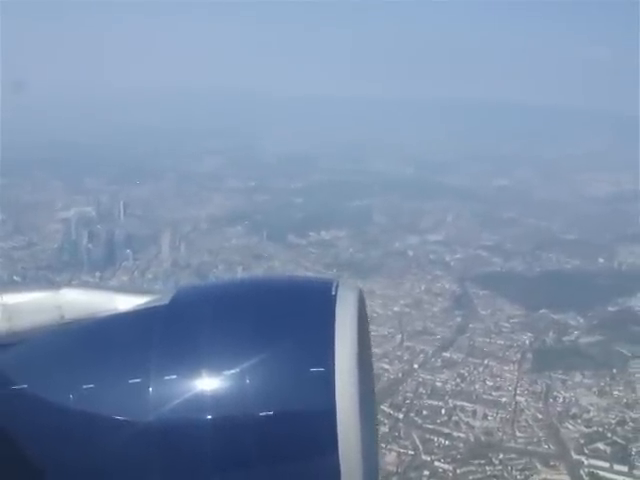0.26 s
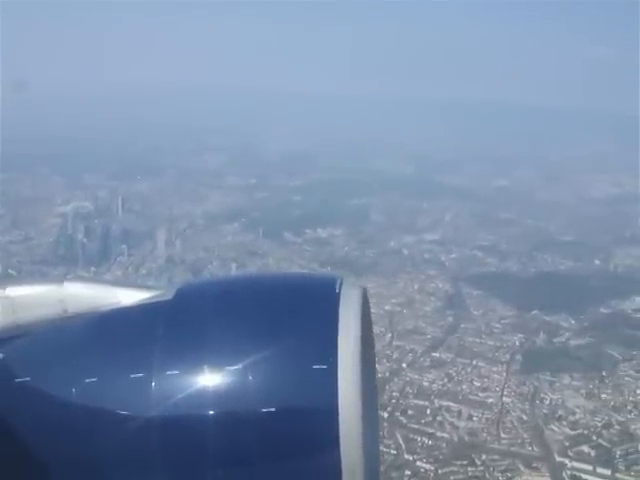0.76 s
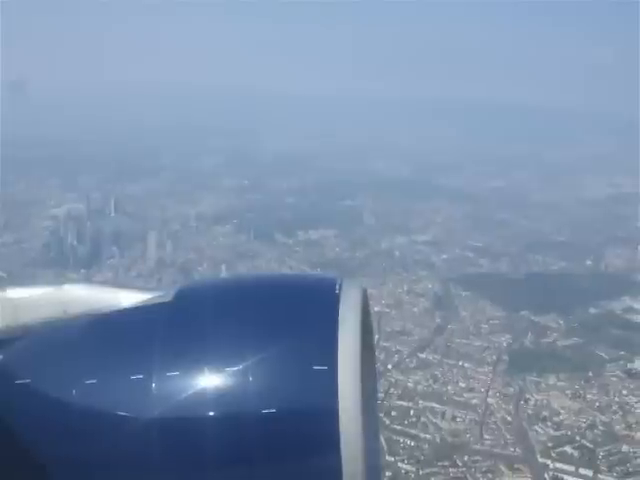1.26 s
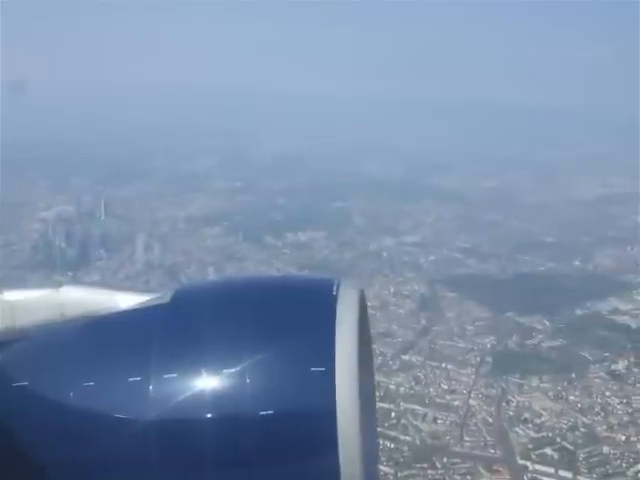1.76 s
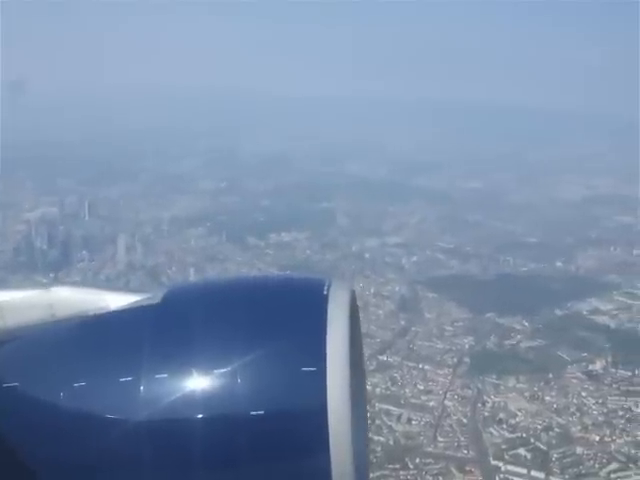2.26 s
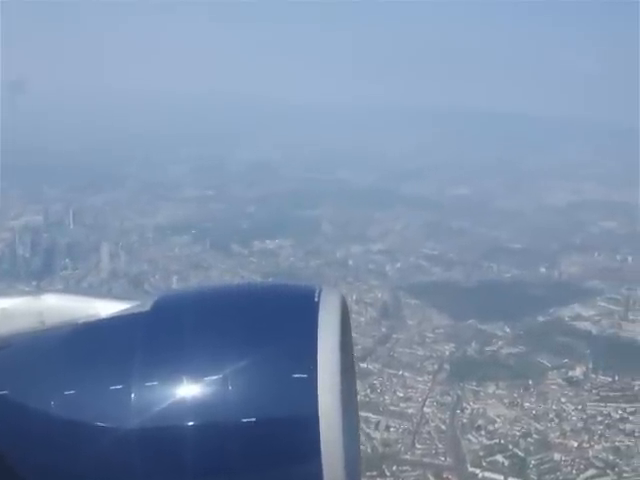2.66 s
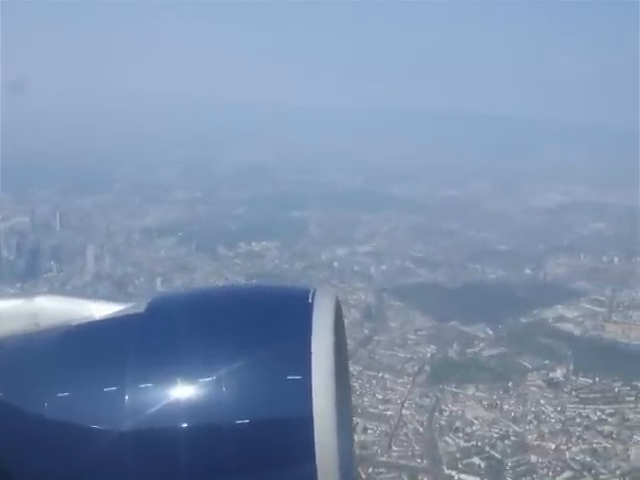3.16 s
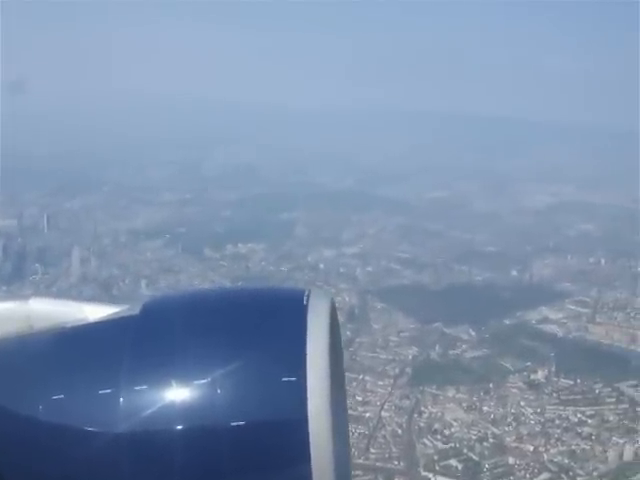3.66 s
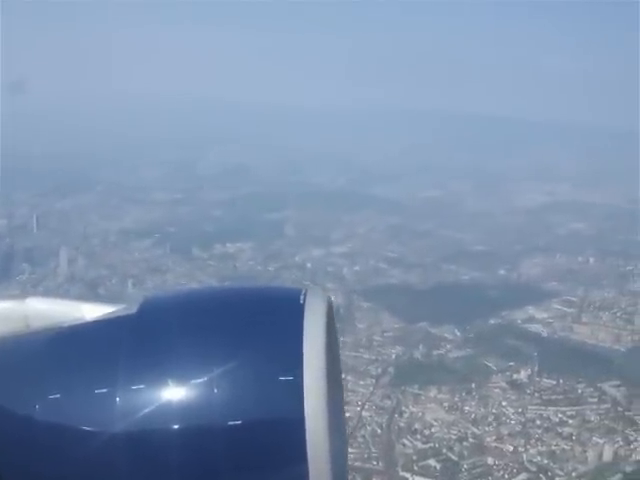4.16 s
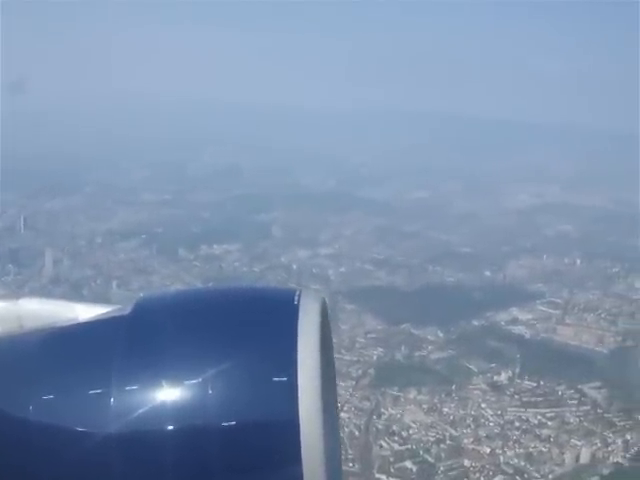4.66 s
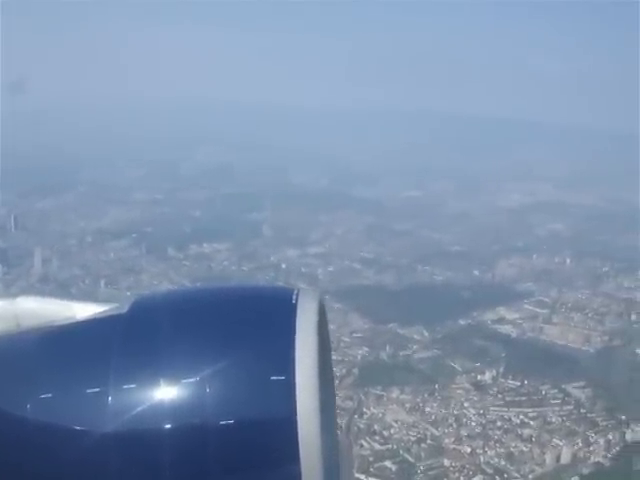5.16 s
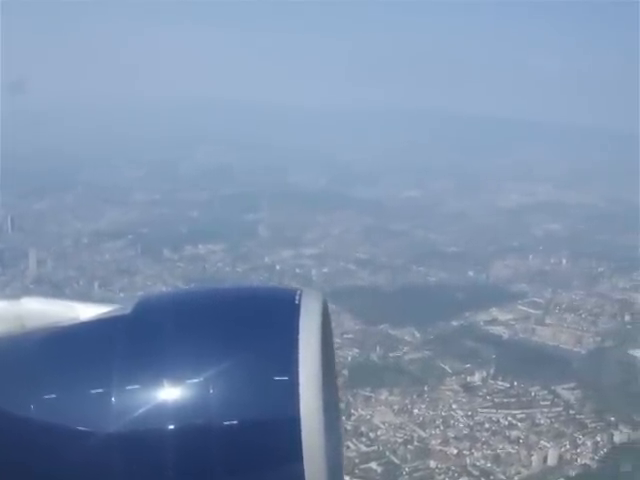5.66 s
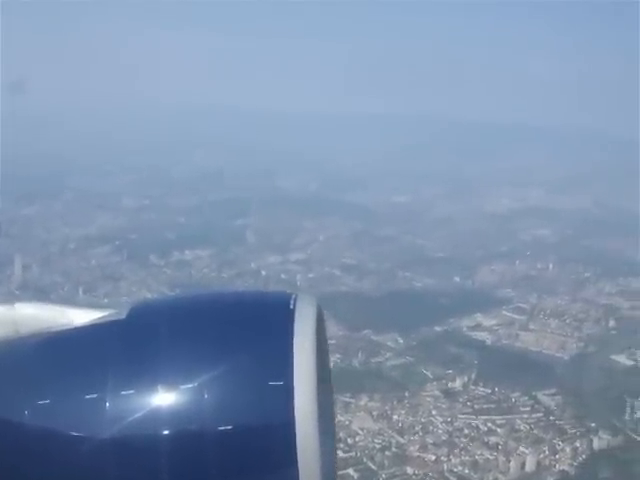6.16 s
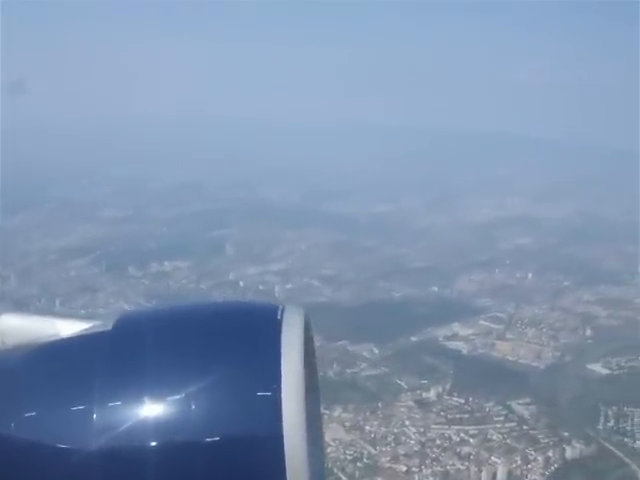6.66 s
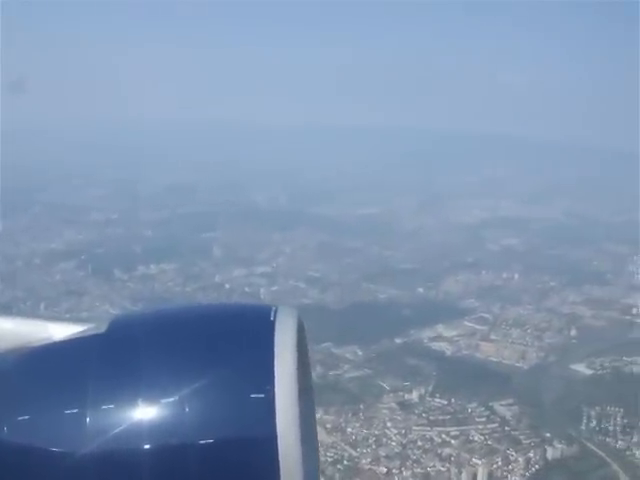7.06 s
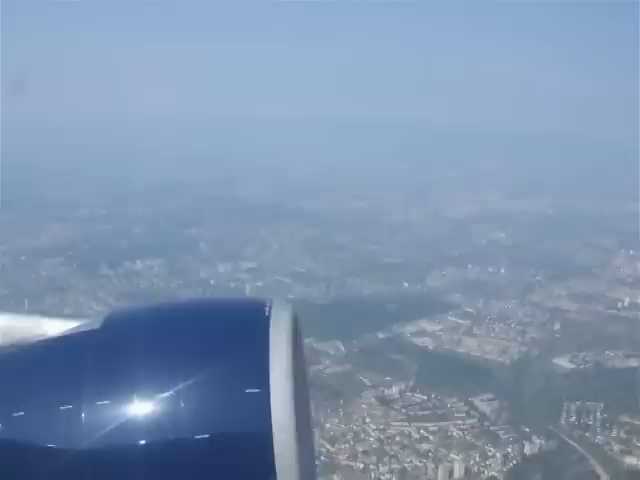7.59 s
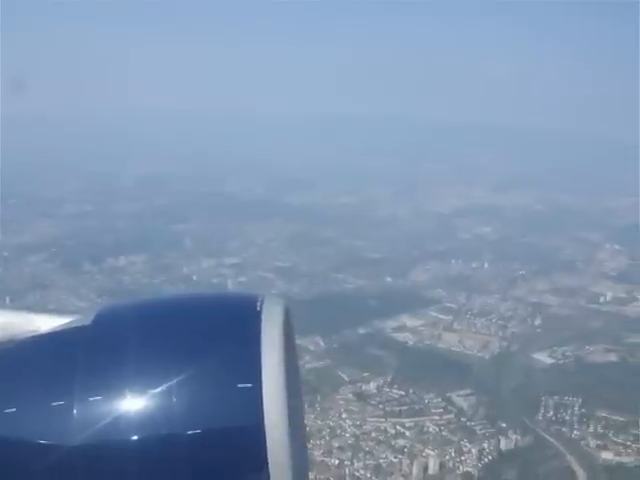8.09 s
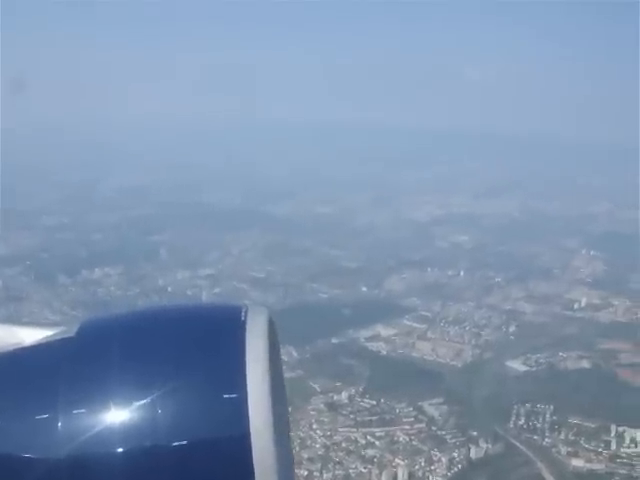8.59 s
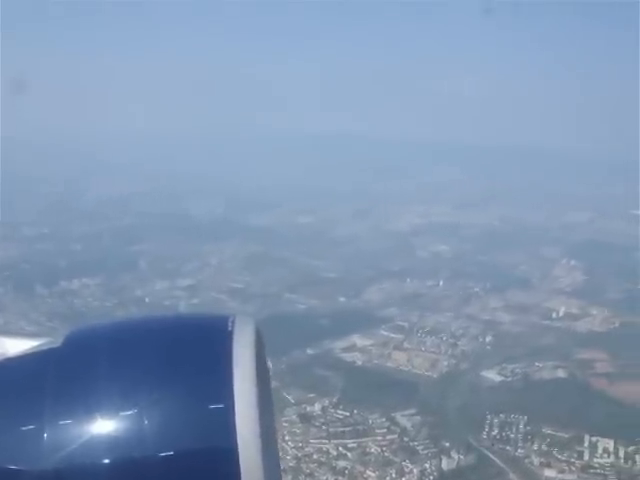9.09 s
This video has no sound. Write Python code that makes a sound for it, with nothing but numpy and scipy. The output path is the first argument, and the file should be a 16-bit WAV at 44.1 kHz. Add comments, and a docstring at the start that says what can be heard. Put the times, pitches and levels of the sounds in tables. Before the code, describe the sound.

Inside an airliner cabin at a window seat beside the engine, a loud low drone runs unbroken. Its deep hum throbs about four to seven times a second, with a raspy fan buzz and a steady higher blade tone on top. Air rushes along the fuselage in small uneven swells, and vents hiss softly. A dull bump and a few light ticks come early, with faint clicks later. The microphone is close, in the cabin.

```python
"""Window seat beside an airliner's engine

Jet and airflow rumble through the cabin wall as filtered noise. Two fans buzz on multiples of their shaft
speeds, slightly out of step; the engine core throbs against the near fan's fifth order. Vents hiss, machinery
hums, small things tick and rustle as bands of noise, and a limiter holds the peaks."""
import sys
import numpy as np
from scipy import signal
from scipy.fft import irfft
from scipy.io import wavfile
from scipy.ndimage import uniform_filter1d, minimum_filter1d

SR = 44100
rng = np.random.default_rng(int(sys.argv[2]) if len(sys.argv) > 2 else 0)


def int16_out(signal):
    """Quantize to a 16-bit WAV file."""
    q = np.round(np.clip(np.atleast_2d(signal).T, -1, 1) * 32767)
    wavfile.write(sys.argv[1], SR, q.astype(np.int16))


N = 411453

BLADES = 34
FAN_HZ = 52.18  # shaft turns per second of the near fan
# the far fan turns faster by SLIP_HZ; the two shafts line up at IN_STEP_S
SLIP_HZ, IN_STEP_S = .125, .8
FIRST_THROB_S = .11
CORE_DB, CORE_OCTAVE_DB, CORE_WAVER_DB = -27, -55, 1.2
# quick eddies ride on the slow swell of the turbulence
EDDIES_PER_S, EDDY_DB = 11, 1.16
# dB that each sound gains per dB of turbulence
BUZZ_SWELL, BLADE_SWELL, RUSH_SWELL = 0.85, 0.8, 1
BLADE_WAVER_DB = 1.3
TOP_HZ, CEILING_DB = 15650, -7.8  # upper band edge, and the limiter's ceiling re full scale


def undb(db):
    """Amplitude ratio from decibels: 20 dB is a factor of ten."""
    return 10 ** (np.asarray(db) / 20)


def curve(rows):
    """Linear interpolation of a table of (seconds, value) at every sample."""
    return np.interp(np.arange(N) / SR, *np.transpose(rows))


def colour(points, hz):
    """Spectral envelope: dB levels joined by straight lines over the logarithm of frequency."""
    point_hz, db = np.transpose(points)
    return np.interp(np.log(np.maximum(hz, 1)), np.log(point_hz), db)


def noise(points):
    """Gaussian noise by spectral shaping: random Fourier components take the given power density."""
    hz = np.arange(N // 2 + 1) * SR / N
    steep_fall = np.maximum(hz / points[-1][0], 1) ** 4  # above the last point
    gain = undb(colour(points, hz)) / steep_fall
    white = rng.standard_normal(len(hz)) + 1j * rng.standard_normal(len(hz))
    return irfft(white * gain, N) * np.sqrt(SR * N) / 2


def walk(rate):
    """Slow random modulation: normal values, rate of them per second, joined by straight lines."""
    steps = np.arange(N) / SR * rate
    return np.interp(steps, np.arange(1024), rng.standard_normal(1024))


def tone(turns, db):
    """Phase-driven sine of the given rms level: one cycle for each turn."""
    phase = (2 * np.pi * (turns - np.floor(turns))).astype(np.float32)
    return np.sqrt(2) * undb(db) * np.sin(phase)


def cabin():
    """Stationary sources: broadband hiss of the vents and discrete hums of machinery that waver slowly."""
    # Even hiss of the air vents. Each row: frequency in Hz, density in dB per Hz.
    vent_spectrum = [(1000, -102), (4500, -98.5), (8000, -98), (10500, -99.6), (12100, -98), (13500, -99.8),
                     (15700, -100.3)]
    # Cabin machinery. Each row: frequency in Hz, rms level in dB before the waver.
    machine_hums = [(76.5, -54), (559, -54.5), (799.5, -60.5)]
    t = np.arange(N) / SR
    hum = sum(tone(hz * t, db + 1.1 * walk(2.53)) for hz, db in machine_hums)
    return noise(vent_spectrum) + hum


def ticks():
    """Transient contact noise: each band of noise rises and decays exponentially."""
    # Ticks and rustles. Each row: time of the crest in seconds, level there in dB, reference frequency
    # of the band in Hz, time constant of the rise in seconds, 60 dB decay time in seconds.
    contacts = [(.625, -28, 900, .003, .03), (.625, -50, 7500, .002, .025), (.765, -36, 1000, .006, .06),
                (.771, -56, 7500, .002, .04), (.866, -54, 8000, .004, .06), (1.319, -54, 5500, .01, .15),
                (3.039, -54, 6500, .004, .08), (3.812, -47.5, 5200, .025, .25), (6.46, -56, 5000, .03, .2),
                (7.287, -43.5, 7000, .001, 0.087), (7.324, -49, 7200, .002, .04),
                (7.586, -51, 7200, .02, .1), (9.167, -50, 7000, .002, .05)]
    out = np.zeros(N)
    for crest_s, db, hz, rise, t60 in contacts:
        first = max(int((crest_s - .2) * SR), 0)
        last = min(int((crest_s + .4) * SR), N)
        at = np.arange(first, last)
        age = at / SR - crest_s  # negative before the crest
        band = signal.butter(2, [hz * 0.48, min(hz * 1.17, SR / 2 - 1)], "band", fs=SR, output="sos")
        grain = signal.sosfilt(band, rng.standard_normal(SR))[:len(at)]
        shape = np.exp(np.minimum(age / rise, -np.log(1000) * age / t60))
        out[at] += undb(db) * shape * grain / grain.std()
    return out


def airflow(gust_db):
    """Broadband flow noise: a steady jet rumble, and a rush whose level follows the turbulence outside."""
    # Rumble of the jet through the wall. Each row: frequency in Hz, density in dB per Hz.
    rumble_spectrum = [(10, -63), (22, -55), (33, -53.5), (55, -45.5), (80, -48), (110, -38.5),
                       (150, -41.5), (178, -48), (250, -47), (290, -51.5), (340, -52), (375, -58),
                       (520, -64.5), (800, -83.5)]
    # Air along the fuselage. Each row: frequency in Hz, density in dB per Hz before swell and flutter.
    rush_spectrum = [(300, -82.5), (650, -71.5), (880, -76), (1060, -74.5), (1350, -80.5), (1700, -80),
                     (2250, -82.5), (3000, -87), (3700, -93), (4600, -94), (6500, -101), (12000, -112)]
    flutter_db = 1.3 * walk(40)
    rush = noise(rush_spectrum) * undb(RUSH_SWELL * gust_db + flutter_db)
    return noise(rumble_spectrum) + rush


def core(fan_turns):
    """Beating: the core falls behind the fan's fifth order and throbs once for each turn that it loses."""
    # Core's lag behind the fifth order. Each row: time in seconds, throbs per second.
    throb_rate = [(0, 3.99), (1.2, 4.89), (1.9, 4.18), (3.1, 5.21), (4.6, 4.63), (6, 5.57), (6.6, 5.09),
                  (7.3, 6.91), (8.2, 5.92), (9.33, 7.33)]
    lost = np.cumsum(curve(throb_rate)) / SR
    turns = 5 * fan_turns - (lost - lost[int(FIRST_THROB_S * SR)])  # in phase at the first throb
    fundamental = tone(turns, CORE_DB + CORE_WAVER_DB * walk(7.8))
    return fundamental + tone(2 * turns, CORE_OCTAVE_DB)


def fan(turns, orders, weak, swell_db, twist, scatter_db, waver_db, count=150, size=7):
    """Harmonic series: unequal blades send out unequal shocks, one ragged wave for every turn of the shaft."""
    k = np.arange(1, count + 1)
    weak_db = colour(weak, k * FAN_HZ) + scatter_db * rng.standard_normal(count)
    db = np.array([orders.get(order, level) for order, level in zip(k, weak_db)])
    angle = np.linspace(0, 1, 4096)  # in turns
    place, low = turns % 1, k <= 11
    # the path to the seat delays each order differently;
    # long waves lag alike from both fans, counted from the fifth
    lag = np.where(low, np.sqrt(2) * (k - 5) ** 2, twist * k ** 2)
    waves = tone(np.outer(k, angle) - lag[:, None], db[:, None])
    out = np.interp(place, angle, waves[low].sum(axis=0))
    # long waves arrive steadily; the short ones swell with the turbulence and waver apart in interleaved sets
    for group in range(size):
        wave = waves[~low & (k % size == group)].sum(axis=0)
        out += np.interp(place, angle, wave) * undb(swell_db + waver_db * walk(14))
    return out


def engines(gust_db):
    """Rotating sources: two fans at nearly equal speeds, the near one's blade-passing tone, core and whine."""
    # Shaft orders that stand out. Each entry: order, rms level in dB (before the swell above order 11).
    near_orders, far_orders = {1: -41, 2: -32, 3: -37.5, 4: -45.5, 5: -26, 6: -30.5, 7: -40.5, 8: -41.5, 9:
                               -41.5, 10: -46.5, 11: -57, 14: -63.5, 16: -51.5, 18: -59, 21: -60.5, 24:
                               -52.5, 25: -55.5, 27: -60, 29: -66, 33: -65.5, 37: -61, 39: -55, 42: -52.5,
                               47: -64, 51: -62, 59: -64.5, 63: -62, 76: -77, 81: -74, 110: -77}, {5: -39.5, 7: -39, 19: -59, 29: -58.5, 31: -58, 34: -70,
                                                    37: -57, 43: -62}
    # Weaker orders between them. Each row: frequency in Hz, level of one order in dB before scatter and swell.
    near_buzz, far_buzz = [(600, -78), (1200, -75), (2100, -74), (2900, -80), (3500, -83.5), (4400, -78),
                           (6000, -87.5), (9000, -98)], [(100, -55), (600, -75.5), (1800, -66.5), (2600, -70.5),
                                              (3500, -77.5), (4400, -82.5), (6000, -90), (9000, -99)]
    # Tone of the passing fan blades. Each row: time in seconds, level in dB before swell and waver.
    blade_tone = [(0, -49), (.8, -49), (1.7, -46.5), (2.6, -48.5), (3.3, -46.5), (4.5, -44.5), (5.9, -49),
                  (6.6, -45.5), (7.2, -45.5), (7.9, -43.5), (8.6, -46.5), (8.9, -50), (9.33, -47)]
    # Compressor and turbine stages. Each row: mean frequency in Hz, level in dB before the waver.
    stage_tones = [(7541, -76), (8059, -76), (11843, -76), (12360, -75), (13876, -77), (15342, -80)]
    t = np.arange(N) / SR
    near_turns = FAN_HZ * t
    far_turns = near_turns + SLIP_HZ * (t - IN_STEP_S)
    swell_db = BUZZ_SWELL * gust_db
    near = fan(near_turns, near_orders, near_buzz, swell_db, twist=np.sqrt(2), scatter_db=1.5, waver_db=1.8)
    far = fan(far_turns, far_orders, far_buzz, swell_db, twist=np.sqrt(np.pi), scatter_db=3.0, waver_db=0.8)
    blade_db = curve(blade_tone) + BLADE_SWELL * gust_db + BLADE_WAVER_DB * walk(13)
    blades = tone(BLADES * near_turns, blade_db)
    # each whine wanders in phase and in level
    whine = sum(tone(hz * t + .4 * walk(14), db + 2.2 * walk(7)) for hz, db in stage_tones)
    return near + far + blades + core(near_turns) + whine


def scene():
    """Superposition at the seat: one turbulence stirs both the engine buzz and the air rush."""
    # Slow swell of the turbulence outside. Each row: time in seconds, dB about its mean.
    slow_swell = [(0.0, 0), (0.2, 1.3), (0.79, -1.4), (0.99, 1.5), (1.99, -2), (2.38, 1), (2.58, -1.5),
                  (2.78, 1), (2.98, -3.2), (3.18, 1.5), (3.57, -0.7), (3.77, 0.3), (5.16, 0.6),
                  (5.56, -0.6), (6.35, 1.0), (7.74, -1.4), (8.54, 0.6), (9.33, -0.2)]
    gust_db = curve(slow_swell) + EDDY_DB * walk(EDDIES_PER_S)
    return (engines(gust_db) + airflow(gust_db) + cabin() + ticks())[None]


def record(dry, size=441):
    """Peak limiting by a smoothed gain around the highest crests, then a steep low-pass filter."""
    headroom = np.minimum(1, undb(CEILING_DB) / (np.abs(dry) + 1e-9))
    gain = uniform_filter1d(minimum_filter1d(headroom, 2 * size), size)
    smooth_gain = uniform_filter1d(gain, size)
    lowpass = signal.ellip(12, .1, 80, TOP_HZ, fs=SR, output="sos")
    return signal.sosfilt(lowpass, dry * smooth_gain)


dry = scene()
out = record(dry)
int16_out(out)
```